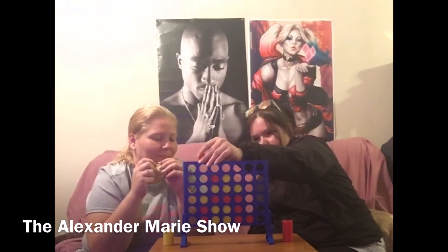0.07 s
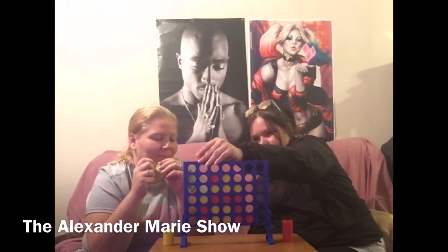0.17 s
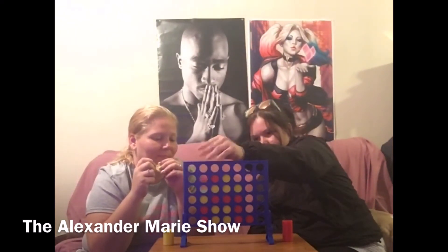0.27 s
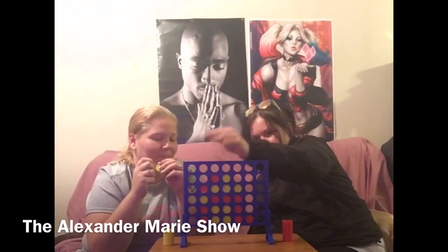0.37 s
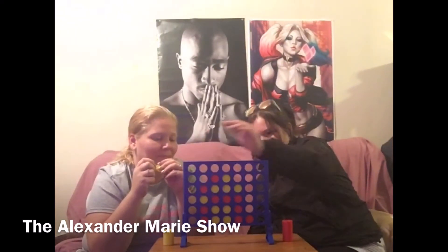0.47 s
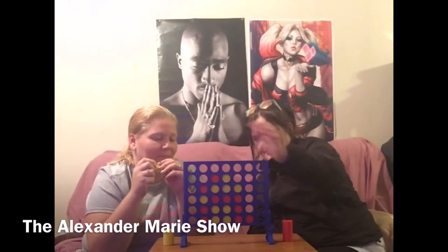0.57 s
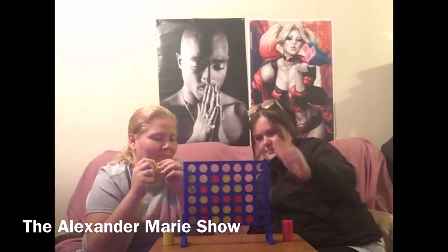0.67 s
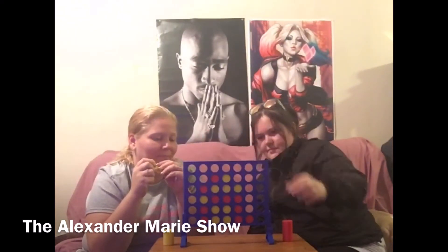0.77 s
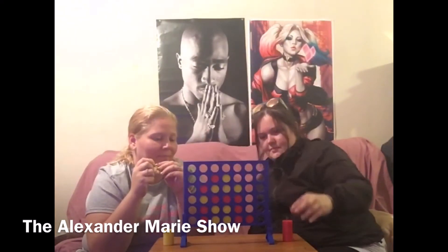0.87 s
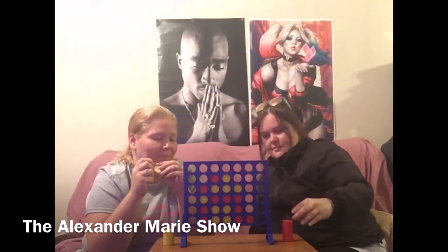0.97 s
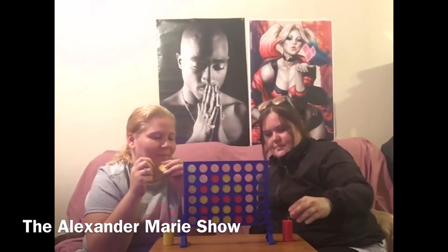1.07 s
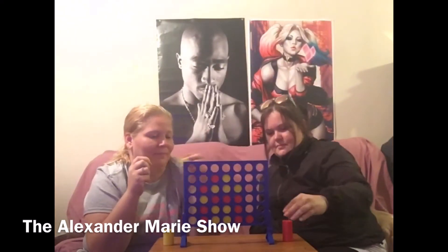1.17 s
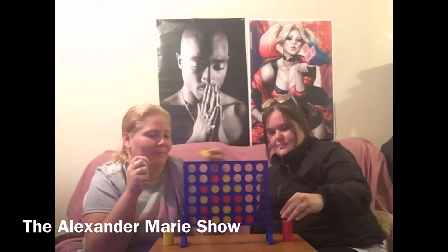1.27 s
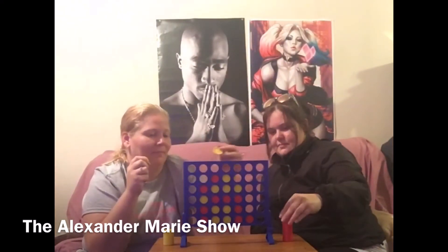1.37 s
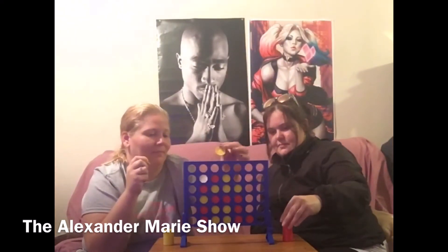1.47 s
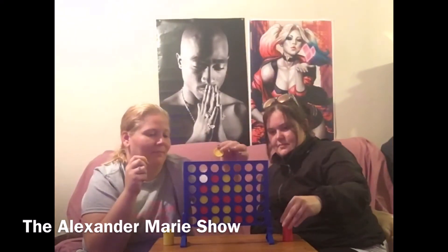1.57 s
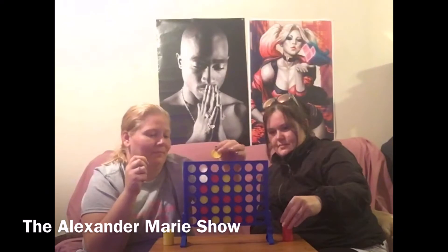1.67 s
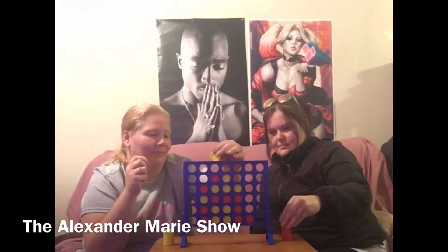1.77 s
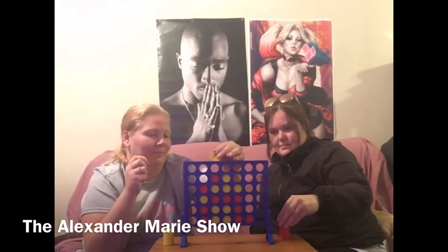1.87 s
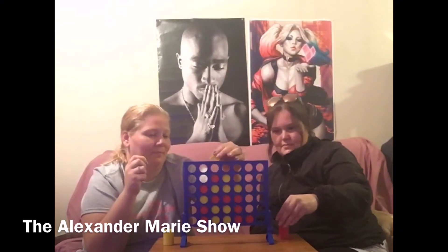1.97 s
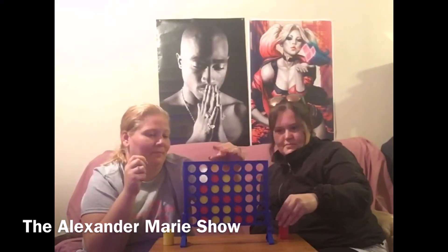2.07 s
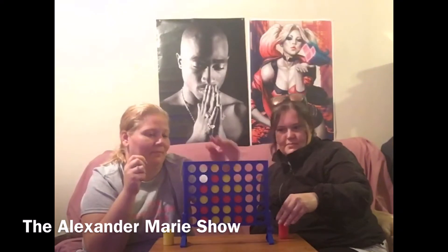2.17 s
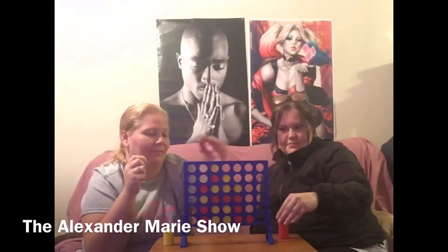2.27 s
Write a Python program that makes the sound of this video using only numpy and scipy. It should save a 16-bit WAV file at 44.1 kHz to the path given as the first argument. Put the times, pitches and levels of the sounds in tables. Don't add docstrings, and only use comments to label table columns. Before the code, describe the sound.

Two plastic game discs fall in turn into a slotted grid, the first loud and clicking, the second quieter after a light edge scrape. Heard a couple of metres away in a small room with low hum.

```python
import sys
import numpy as np
from scipy import signal
from scipy.fft import rfft, irfft
from scipy.io import wavfile
from scipy.ndimage import uniform_filter1d

SR = 44100
rng = np.random.default_rng(int(sys.argv[2]) if len(sys.argv) > 2 else 0)


def nominal_scale(level):
    x = np.asarray(level, float) / 20
    return 10 ** x


def unload_wav(signal):
    wavfile.write(
        sys.argv[1],
        SR,
        np.round(np.clip(np.atleast_2d(signal).T, -1, 1) * 32767).astype(np.int16),
    )


N = 101430


def unit(x):
    return x / np.sqrt(np.mean(x ** 2))


def band(x, hz, width):
    return signal.lfilter(*signal.iirpeak(hz, hz / width, fs=SR), x)


def highpass(x, hz):
    return signal.sosfilt(signal.butter(4, hz, "high", fs=SR, output="sos"), x)


def colour(x, points):
    hz, db = np.array(points).T
    f = np.maximum(np.fft.rfftfreq(len(x), 1 / SR), 1)
    gain = nominal_scale(np.interp(np.log(f), np.log(hz), db))
    return unit(irfft(rfft(x) * gain, len(x)))


def walk(rate):
    k = int(SR / rate)
    steps = np.repeat(rng.standard_normal(N // k + 1), k)
    return 0.43 * uniform_filter1d(uniform_filter1d(steps, k), k)[:N]


def curve(rows):
    s, db = np.array(rows).T
    return nominal_scale(np.interp(np.arange(N) / SR, s, db, left=-120, right=-120))


def ring(t, hz, t60, rise):
    onset = np.sin(np.pi / 2 * np.minimum(t / rise, 1)) ** 2
    return np.sin(2 * np.pi * hz * t) * np.exp(-np.log(1000) * t / t60) * onset


def struck(rows, rise):
    out, t = np.zeros(N + SR), np.arange(SR // 4) / SR
    for s, hz, db, t60 in rows:
        start = int(s * SR)
        out[start:start + len(t)] += nominal_scale(db) * ring(t, hz, t60, rise)
    return out[:N]


def ticks(per_s, spread_db):
    chance, size = rng.random((2, N))
    clicks = (chance < per_s / SR) * nominal_scale(-spread_db * np.log(1 - size))
    puffs = signal.lfilter([1], [1, -np.exp(-1 / (.001 * SR))], clicks)
    return unit(puffs * rng.standard_normal(N))


def choked_ring(t, db, hz, rise):
    free_s = 0.0063 + rise + 0.0038 * nominal_scale(db)
    return nominal_scale(db) * ring(t, np.clip(hz, 4225, 4405), 0.074, rise) * np.exp(-((t / free_s) ** 4))


# f/Hz, level/dB, t60/s
BODY_MODES = [(1000, -17, .018), (1430, -15, .02), (1960, -14, .015), (2770, -14, .015), (3500, -8, .02),
              (3860, -5, .025), (5350, -7, .015), (6530, -11, .02), (7930, -11, .03), (9300, -16, .02),
              (13000, -20, .02)]
# f/Hz, level/dB per Hz
CRACK_COLOUR = [(800, -24), (2000, -16), (3000, -8), (4000, -1.5), (4800, -6), (5500, -6), (8100, -15.5),
                (11000, -21.5), (15700, -29)]


def crack(t, rise):
    y = np.zeros(len(t))
    for hz, db, t60 in BODY_MODES:
        level, detune = rng.standard_normal(2)
        y += nominal_scale(1.5 + db + 3 * level) * ring(t, hz * (1 + .012 * detune), t60, 0.00061)
    t = t[:2048]
    puff = colour(rng.standard_normal(2048), CRACK_COLOUR)
    y[:2048] += nominal_scale(4) * puff * np.exp(-t / 0.0067) * np.minimum(t / rise, 1)
    return y


# t/s, ring level/dB, ring f/Hz, crack level/dB, rise/s
FIRST_DISC = [(.1503, -22.5, 4280, -39.5, 0.00077), (.16, -31, 4060, -53.5, .003),
              (.171, -37, 4230, -42.5, 0.0011), (.182, -29, 4130, -52.5, .002),
              (.1978, -28, 4140, -48.5, 0.00045), (.212, -29.5, 4170, -49, 0.0018),
              (.2243, 4, 4280, -11, .0006), (.2365, -0.5, 4190, -21.5, 0.0014),
              (.2465, -2.5, 4315, -19, .004), (.2555, 1, 4275, -36.5, .004), (.267, -25, 4320, -30, .002),
              (.2765, -9.5, 4317, -30.5, .005), (.287, -6, 4380, -35.5, .003),
              (.303, -12, 4325, -21.5, 0.003), (.3135, -1.5, 4378, -20.5, 0.002),
              (.322, -9, 4322, -30.5, .002), (.335, -3, 4263, -27.5, 0.005),
              (.3455, -7, 4326, -31.5, 0.004), (.364, -22, 4380, -44.5, .004),
              (.372, -11.5, 4285, -43, .005), (.398, -31.5, 4330, -54, .005),
              (.427, -28.5, 4283, -57, .005)]
SECOND_DISC = [(1.698, -51, 4400, -63, .003), (1.711, -47, 4350, -68, 0.0039),
               (1.733, -47, 4290, -70, 0.0042), (1.753, -48, 4440, -65, .004),
               (1.773, -45, 4350, -67, .003), (1.7825, -47, 4370, -49, 0.0017),
               (1.798, -44, 4370, -55, .004), (1.8238, -40, 4360, -60, .002), (1.838, -41, 4400, -60, .003),
               (1.884, -21.5, 4300, -32, 0.00027), (1.905, -23.5, 4480, -42, 0.00049),
               (1.919, -27, 4300, -55, 0.0022), (1.9317, -21, 4236, -43.5, .003),
               (1.95, -17, 4300, -36, 0.00098), (1.9596, -16, 4240, -43, 0.003),
               (1.9742, -11.5, 4354, -17, 0.0011), (1.981, -8.5, 4275, -24, 0.0015),
               (1.992, -18, 4160, -28.5, .0015), (2.003, -11.5, 4260, -32, 0.0065),
               (2.017, -14, 4230, -32.5, 0.0013), (2.026, -18, 4310, -30.5, 0.0025),
               (2.046, -21, 4290, -36, .002), (2.064, -25, 4280, -48, 0.0026),
               (2.075, -23, 4300, -65, 0.0023), (2.103, -29, 4330, -52, .003),
               (2.113, -25, 4360, -69.5, 0.005), (2.16, -30, 4290, -60, 0.0064),
               (2.2, -45, 4325, -70, 0.0055)]


def contacts():
    rings, cracks = np.zeros((2, N + SR))
    t = np.arange(SR // 4) / SR
    for s, db, hz, crack_db, rise in FIRST_DISC + SECOND_DISC:
        i = slice(int(s * SR), int(s * SR) + len(t))
        rings[i] += choked_ring(t, db, hz, rise)
        cracks[i] += nominal_scale(crack_db) * crack(t, rise)
    return rings[:N], cracks[:N]


# t/s, f/Hz, level/dB, t60/s
FREE_RINGS = [
    (.152, 4235, -35, 0.35),
    (.415, 4335, -34.5, 0.32),
    (1.73, 4340, -48.5, .3),
    (1.772, 4340, -44.5, 0.48),
    (1.885, 4290, -37, 0.36),
    (1.951, 4350, -23, .25),
    (2.15, 4325, -44, 0.29),
]


def free_rings():
    return struck(FREE_RINGS, .004)


# t/s, f/Hz, level/dB, t60/s
STRUCK_MODES = [(.144, 2805, -25, 0.0099), (.1445, 2370, -34, 0.029), (.1442, 2150, -24.5, 0.011),
                (.208, 2000, -28, 0.021), (.2255, 13470, -17, 0.027), (.2255, 13000, -9.5, 0.02),
                (.236, 8000, -32.5, .08), (.245, 4030, -29, 0.046), (.252, 5520, -15, .04),
                (.25, 3510, -17, 0.051), (.335, 2670, -38, 0.036), (.228, 2820, -21, 0.025),
                (.312, 2710, -27, 0.075), (.29, 3880, -31, .15), (.318, 8060, -21.5, .07),
                (1.70, 2008, -40, 0.035), (1.884, 13800, -46, 0.021), (1.9495, 13200, -32.5, 0.013),
                (1.9495, 14100, -39, .01), (1.953, 7960, -42, 0.059), (1.985, 7960, -26.5, .06),
                (2.018, 9700, -35, .04), (2.018, 3900, -23, 0.075), (1.98, 3850, -36, .04),
                (2.045, 3700, -29, 0.045), (2.1, 3830, -49, .08)]


def overtones():
    return struck(STRUCK_MODES, 0.00061)


# t/s, level/dB
CHATTER_LEVELS = [
    [(.1435, -55.5), (.151, -44.5), (.2235, -43), (.226, -20), (.27, -27.5), (.318, -24), (.36, -39),
     (.42, -54.5)],
    [(1.8836, -58), (1.886, -30.5), (1.94, -38.5), (1.9738, -33), (1.977, -25), (2.0, -24), (2.05, -40),
     (2.12, -65)],
]
# f/Hz, width/Hz, level/dB
CHATTER_MODES = [(1900, 1500, -13), (3840, 250, -9.5), (7930, 120, -17.5), (12950, 200, -24.5)]


def chatter():
    x = ticks(2000, spread_db=2)
    y = colour(x, CRACK_COLOUR) + nominal_scale(-9) * unit(band(band(x, 4800, 90), 4310, 200))
    for hz, width, db in CHATTER_MODES:
        y = y + nominal_scale(db) * unit(band(x, hz, width))
    return nominal_scale(-5) * y * sum(curve(rows) for rows in CHATTER_LEVELS)


# t/s, level/dB
SCRAPE_LEVEL = [
    (1.52, -68),
    (1.6, -56),
    (1.69, -48.5),
    (1.71, -46.5),
    (1.77, -49),
    (1.785, -43),
    (1.81, -47.5),
    (1.83, -48),
    (1.884, -51),
]
# f/Hz, width/Hz, level/dB
SCRAPE_BANDS = [(600, 400, -8.5), (1210, 910, 0.5), (2140, 1300, -1.5), (3200, 1000, -4.5), (3897, 900, -8),
                (4904, 1400, -12.5)]
# t/s, level/dB
AIR_LEVEL = [
    (1.54, -81.5),
    (1.63, -66),
    (1.8, -69),
    (1.84, -71),
    (1.884, -72),
]
# f/Hz, width/Hz, level/dB
AIR_BANDS = [(5394, 510, 5), (9200, 500, -4.5), (13480, 1200, -2.5)]


def scrape():
    out = 0
    for bands, level in ((SCRAPE_BANDS, SCRAPE_LEVEL), (AIR_BANDS, AIR_LEVEL)):
        slips = ticks(2400, spread_db=-3.0)
        rub = 0
        for hz, width, db in bands:
            wander_db = 3.0 * walk(40)
            rub = rub + nominal_scale(db + wander_db) * unit(band(band(slips, hz, width), hz, 2 * width))
        out = out + nominal_scale(-4.0) * curve(level) * rub
    return out


# t/s, f/Hz, level/dB, t60/s
EDGE_CATCHES = [(1.604, 1074, -40.5, .03), (1.62, 1726, -48, .03), (1.63, 2084, -56.5, .08),
                (1.672, 3050, -44, 0.066), (1.696, 1900, -43.5, .04), (1.712, 1840, -49, 0.034),
                (1.716, 2280, -40, 0.025), (1.73, 2760, -42, 0.038), (1.765, 1480, -45, .03),
                (1.78, 3880, -39, 0.033), (1.783, 2360, -36, 0.017), (1.826, 2740, -52, .03),
                (1.825, 3960, -38, 0.022)]


def catches():
    return struck(EDGE_CATCHES, 0.0015)


# t/s, f/Hz, level/dB, t60/s
TABLE_THUMPS = [
    (.2245, 473, -28, .03),
    (.2245, 600, -38, .02),
    (.226, 390, -35, .03),
    (.232, 170, -34, 0.22),
    (.24, 298, -38.5, .1),
    (1.976, 334, -36.5, 0.055),
    (1.975, 600, -45, .03),
]


def thumps():
    return struck(TABLE_THUMPS, 0.0019)


# f/Hz, t60/s, level/dB
ROOM_BANDS = [(670, 0.5, -3), (1940, 0.28, 8), (4300, 0.38, 4), (8190, 0.34, -6), (12000, 0.2, 9.5)]


def room(x):
    t = np.arange(SR) / SR
    tail = np.zeros(SR)
    for hz, t60, db in ROOM_BANDS:
        noise = band(rng.standard_normal(SR), hz, hz * 1.7)
        tail += nominal_scale(db) * noise * np.exp(-np.log(1000) * t / t60)
    tail *= np.clip(t / 0.0033 - .5, 0, 1)
    return nominal_scale(-5) * signal.fftconvolve(x, tail / np.sqrt(np.sum(tail ** 2)))[:N]


def sleeve():
    t = np.arange(N) / SR
    swell = np.exp(-((t - 1.072) / 0.011) ** 2 / 2)
    return nominal_scale(-55) * swell * unit(band(rng.standard_normal(N), 6760, 8950))


# f/Hz, level/dB per Hz
HISS_COLOUR = [(150, -30.5), (250, -5.5), (268, -20.5), (366, -10.5), (500, -17), (1770, -12.5),
               (2820, -21), (5180, -22), (15700, -49.5)]
# t/s, level/dB
FAN_SWELL = [(0, 2), (.55, 1.5), (.7, 1.5), (.85, -1.5), (1.3, -0.5), (2.3, -2)]


def fan():
    hiss, swell = colour(rng.standard_normal(N), HISS_COLOUR), walk(2.8)
    flickering = 0
    for hz in 330 * 2 ** np.arange(6.):
        flickering = flickering + band(hiss, hz, hz * 2.0) * nominal_scale(0.57 * swell + walk(24))
    return nominal_scale(-53) * unit(flickering) * curve(FAN_SWELL)


# f/Hz, width/Hz, rms level/dB
RUMBLE_BANDS = [
    (42, 8.3, -42.5),
    (59.7, 16, -43.5),
    (91, 9.5, -56),
    (122.5, 11, -49.5),
    (170, 45, -54.5),
    (290, 86, -63.5),
    (357, 21, -69),
]
# t/s, level/dB
BUILDING_SWELL = [(0.0, -38), (0.89, -43.5), (1.02, -53.5), (1.32, -40), (1.4, -49), (1.59, -40.5),
                  (1.7, -49.5), (1.74, -43.5), (2.3, -43)]
# t/s, level/dB
MOTOR_SWELL = [(0.0, -46.5), (0.01, -40.5), (0.13, -54.5), (0.26, -39.5), (0.36, -50.5), (0.74, -45),
               (1.0, -50), (1.41, -44.5), (2.3, -52)]


def rumble():
    building, motor = unit(curve(BUILDING_SWELL)), unit(curve(MOTOR_SWELL))
    out = 0
    for k, (hz, width, db) in enumerate(RUMBLE_BANDS):
        noise = band(band(rng.standard_normal(N), hz, width), hz, 2 * width)
        out = out + nominal_scale(db) * unit(noise) * (building if k < 2 else motor)
    return out


def hum():
    return nominal_scale(-53.5 + walk(3.2)) * np.sin(2 * np.pi * 240 * np.arange(N) / SR)


def preamp():
    return nominal_scale(-71) * rng.standard_normal(N)


def scene():
    rings, cracks = contacts()
    rings = rings + free_rings()
    knocks = cracks + overtones() + catches()
    rest = highpass(knocks + chatter() + scrape(), 650)
    echo = room(rest + nominal_scale(-6) * rings)
    background = sleeve() + fan() + rumble() + hum() + preamp()
    return (rings + rest + echo + thumps() + background)[None]


def top_cut(x):
    return signal.sosfilt(signal.butter(12, 15830, fs=SR, output="sos"), x)


def record(dry):
    lowpass = signal.ellip(8, .2, 60, 15650, fs=SR, output="sos")
    x = signal.sosfilt(lowpass, highpass(dry, 39.9))
    return top_cut(np.clip(x, -1, 1))


dry = scene()
out = record(dry)
unload_wav(out)
```